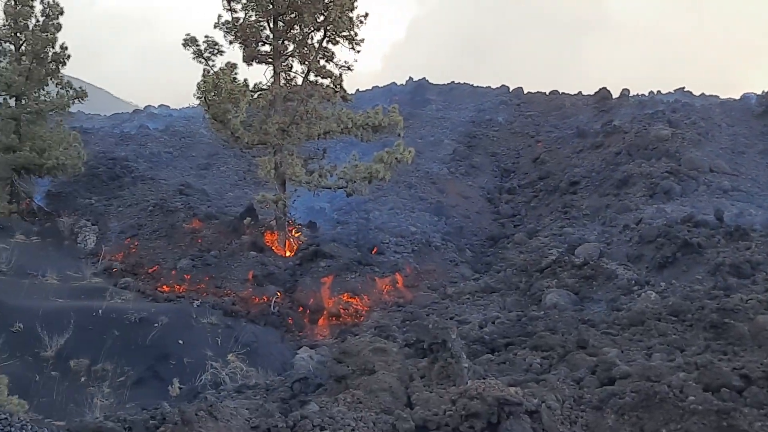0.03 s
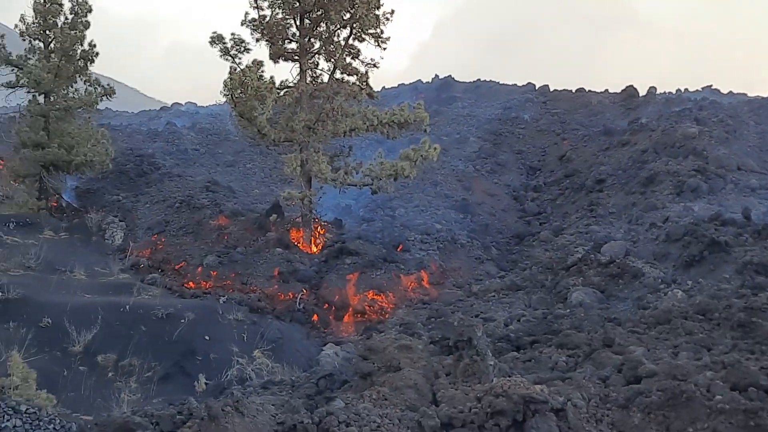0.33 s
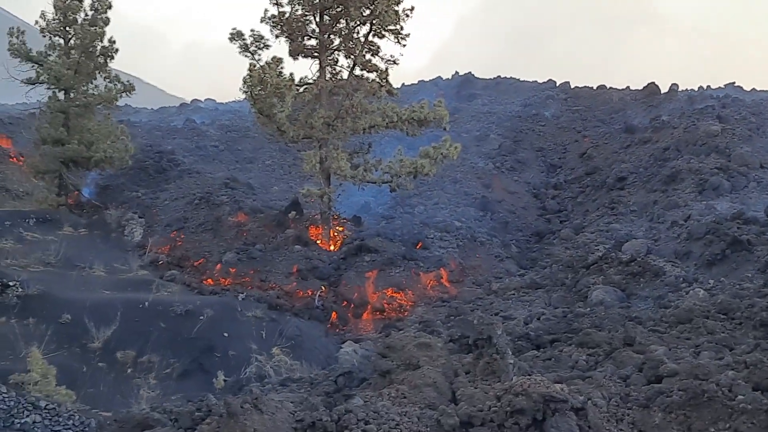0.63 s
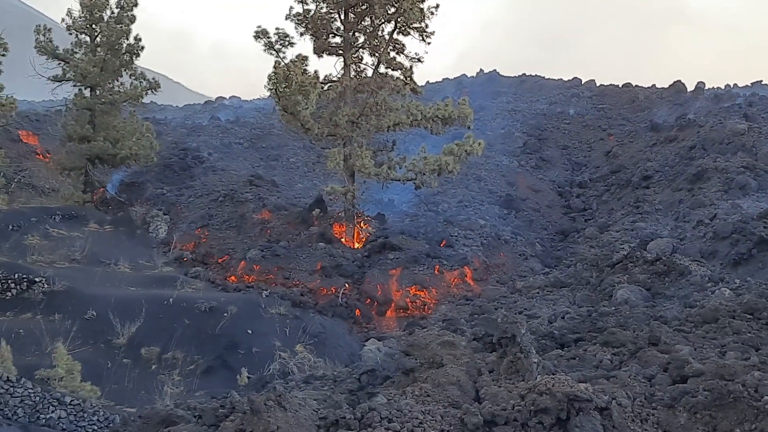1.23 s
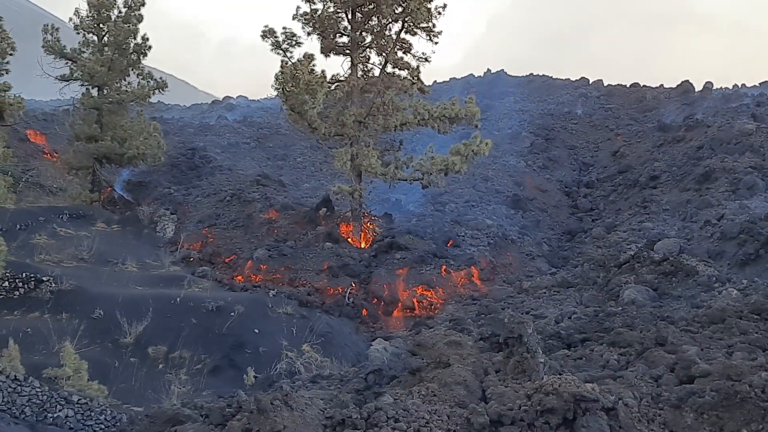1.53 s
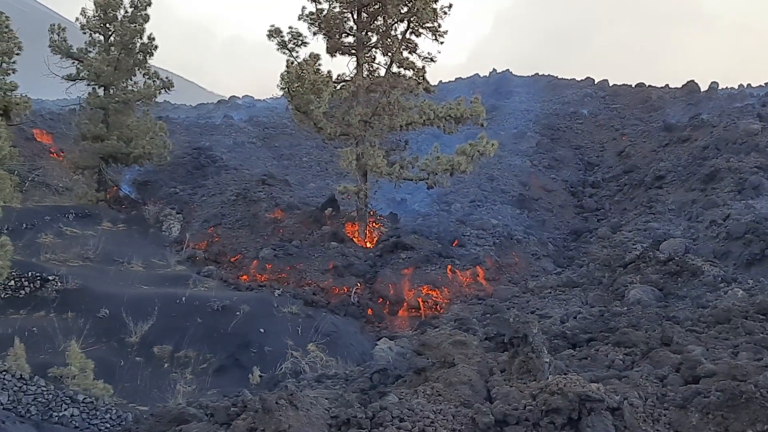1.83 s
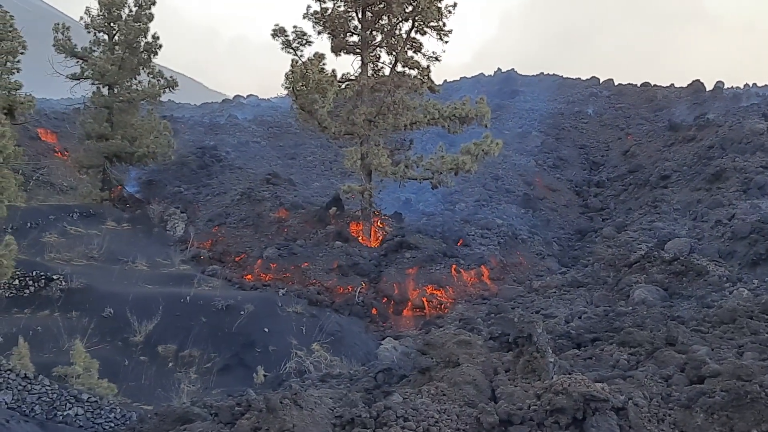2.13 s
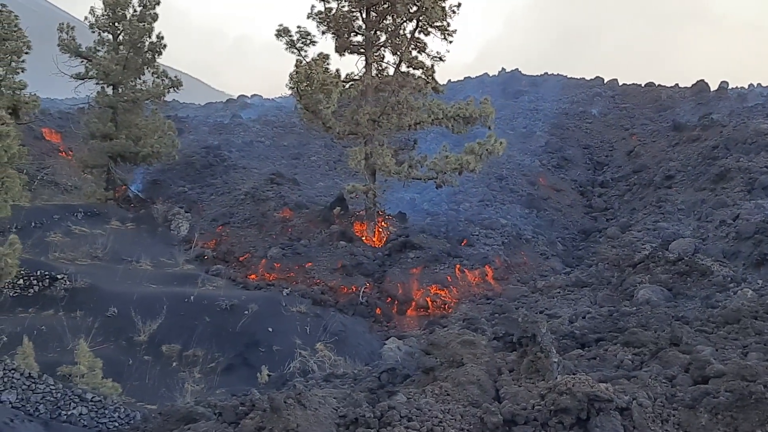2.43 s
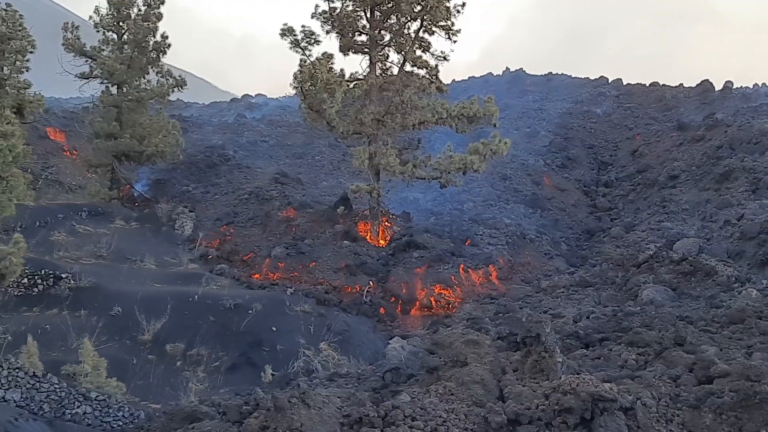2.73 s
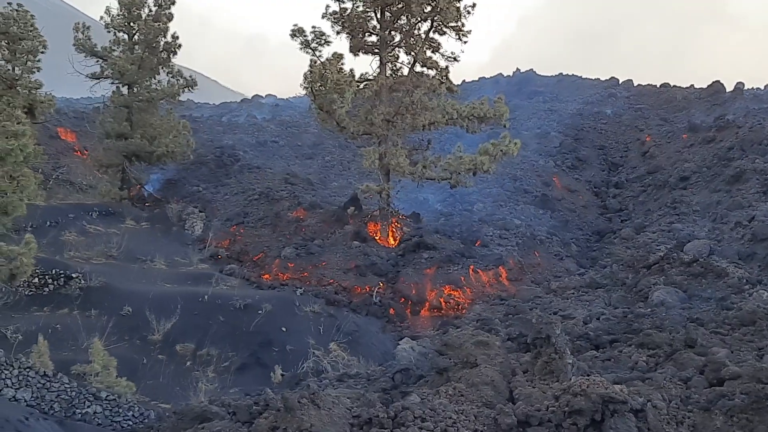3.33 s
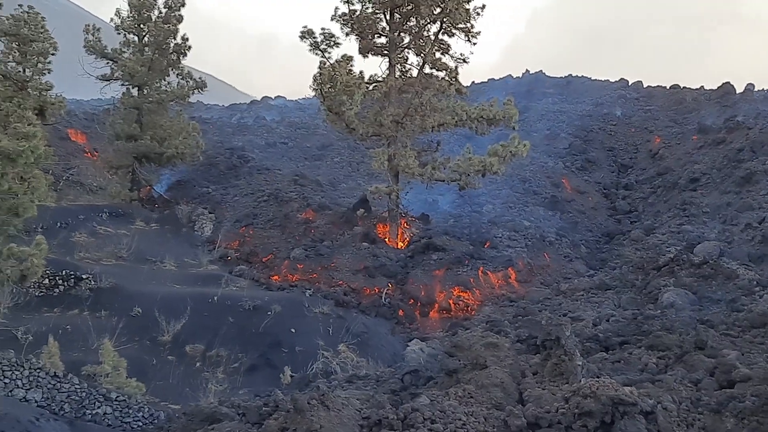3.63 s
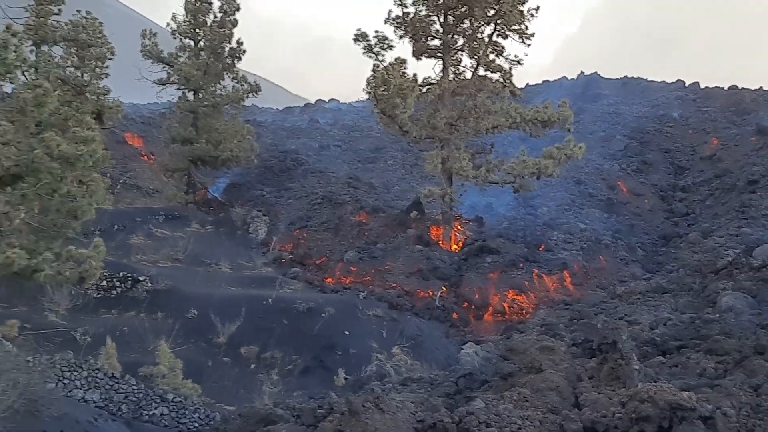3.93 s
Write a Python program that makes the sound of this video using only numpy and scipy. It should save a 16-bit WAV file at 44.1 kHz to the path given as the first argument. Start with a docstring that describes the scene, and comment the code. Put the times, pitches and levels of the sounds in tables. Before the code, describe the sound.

A vegetation fire lit by lava crackles steadily outdoors, with scattered louder pops and brief rattles of embers at a distance. Close up, uneven wind buffets the microphone the whole time with a deep rumble and soft thumps.

```python
"""Lava burning through brush

Some way off, lava creeps into pines and brush. Wood snaps as its fibres break, embers rattle
and small twigs crackle, over a fine sizzle, a few squeaks and a distant roar. Gusts of wind tumble
over the microphone's two openings (ports), making a deep rumble, a hollow flutter and thumps."""
import sys
import numpy as np
from scipy import signal
from scipy.fft import rfft, irfft
from scipy.io import wavfile
from scipy.ndimage import uniform_filter1d

SR = 44100
rng = np.random.default_rng(int(sys.argv[2]) if len(sys.argv) > 2 else 0)


def wav_record(signal):
    """Record a signal, one row per channel, as 16-bit PCM in the file named by sys.argv[1]."""
    frames = np.transpose(np.atleast_2d(signal))
    bounded = np.clip(frames, -1, 1)
    # unit amplitude maps onto the largest positive 16-bit level
    quanta = np.round(bounded * 32767).astype(np.int16)
    wavfile.write(sys.argv[1], SR, quanta)


N = 176400

# The three tone colours in a snap: woody body, sharp bite, fine tick on top (f/Hz, level/dB)
BODY_TONE = [(300, -36), (700, -4.5), (1050, -2.5), (1350, -2), (1800, 0.5), (2200, -1), (2700, -12.5),
             (5000, -39)]
BITE_TONE = [(1500, -31), (2600, -6.5), (3300, -1), (4000, 1), (4900, 1), (6500, -4.5), (8000, -23),
             (12000, -74)]
TICK_TONE = [(4000, -11), (7500, 4), (9500, -4), (11500, -6), (13000, -14), (15500, -20)]
def snap(body_db, bite_db, tick_db, ring_hz, size=512):
    """One piece of wood breaks, its fibres tear on briefly, and it rings at a pitch of its own."""
    break_s, splinter_s, splinter_db = 0.0004, 0.0022, -0.5
    ring_db, ring_octaves, stereo_width = 7, 0.16, 0.71
    t, f = np.arange(size) / SR, np.fft.rfftfreq(size, 1 / SR)
    parts = [(body_db, BODY_TONE), (bite_db, BITE_TONE), (tick_db, TICK_TONE)]
    power = sum((amp(db) * unit(amp(at_pitch(tone, f)))) ** 2 for db, tone in parts)
    octaves_away = np.log2((f + 1) / ring_hz)
    power *= amp(ring_db * np.exp(-(octaves_away / ring_octaves) ** 2)) ** 2
    fade = np.hypot(unit(np.exp(-t / break_s)), amp(splinter_db) * unit(np.exp(-t / splinter_s)))
    hiss = rng.standard_normal((3, size))
    tear = (hiss[2] + stereo_width * hiss[:2]) * fade
    # The tear gives the fine grain; its broad colour is swapped for the wood's.
    tear_power = uniform_filter1d((abs(rfft(tear)) ** 2).mean(0), size=5)
    wood = ringing(10 * np.log10(power / tear_power))
    sound = signal.fftconvolve(tear, wood[None], axes=1)
    energy = power.mean() * SR / 1000  # levels count as if the snap lasted one millisecond
    return sound * np.sqrt(energy / np.sum(sound ** 2, axis=1, keepdims=True))


# Snaps that stand out (t/s, body level/dB, bite level/dB, tick level/dB, ring f/Hz)
WOOD_SNAPS = [(0.0297, -35, -36.5, -40, 1700), (0.051, -51.0, -43.5, -49.5, 1890),
              (0.1615, -48, -39, -47, 6260), (0.372, -39.5, -45, -63.0, 3400),
              (0.5591, -49, -48.5, -50, 1100), (0.6073, -66, -64, -48, 1880),
              (0.6932, -50, -44.5, -45.5, 1400), (0.7285, -64.5, -49, -52.5, 4750),
              (0.7389, -54.0, -33, -38.5, 4700), (0.798, -28.0, -29, -45, 1760),
              (0.824, -67, -50, -54, 12000), (0.8452, -46, -40.5, -47.0, 6060),
              (0.9755, -41.5, -38, -70.0, 7740), (0.9856, -43, -38, -41.5, 7300),
              (0.998, -44, -46, -48, 4310), (1.0151, -34, -41.5, -46.0, 3040),
              (1.1212, -64.0, -55, -59.5, 7740), (1.144, -57, -53, -52, 1795),
              (1.2972, -70, -69, -53, 9870), (1.6183, -44.5, -46.5, -60.0, 8530),
              (1.7548, -61.0, -54, -48.5, 5240), (1.8145, -59.0, -46.5, -53, 3720),
              (1.8738, -24, -24, -65, 3220), (1.9774, -48.5, -45.5, -55, 6060),
              (2.0315, -54.5, -47, -50.5, 6680), (2.1609, -45.5, -49, -46, 4100),
              (2.334, -48, -45, -68.0, 4050), (2.3454, -38.5, -41.5, -53.0, 1710),
              (2.4325, -47, -37.5, -47, 1710), (2.5218, -64, -51, -50.5, 8960),
              (2.5655, -53, -45, -47, 2180), (2.6285, -64, -65, -52, 1400),
              (2.7182, -68.5, -48.5, -50, 6900), (2.7851, -57, -43.5, -48, 5300),
              (2.861, -46.5, -46.0, -50, 3380), (2.8872, -60.5, -57.5, -51.5, 12100),
              (3.0722, -69.0, -66, -51, 12000), (3.1201, -55.5, -52, -48, 12000),
              (3.1703, -62, -46, -48.5, 1100), (3.2277, -24.5, -39, -59, 1170)]
def burning_wood():
    """Burning wood breaks, one snap at a time."""
    out = np.zeros((2, N))
    for s, body_db, bite_db, tick_db, ring_hz in WOOD_SNAPS:
        add(out, s, snap(body_db, bite_db, tick_db, ring_hz))
    return out


def small_snap(ring_hz, tilt_db=0):
    """A twig or ember breaks; more tilt means less body and more tick."""
    return snap(body_db=-4.5 - tilt_db, bite_db=0, tick_db=-7.5 + tilt_db, ring_hz=ring_hz)


# Embers crumbling (t/s, length/s, top bite level/dB, ring f/Hz)
EMBER_RATTLES = [(0.432, .012, -51, 5500), (1.299, 0.14, -62, 7000), (1.879, .008, -41, 4540),
                 (2.432, .028, -48.5, 5200), (3.235, 0.016, -47.5, 2200)]
def embers(bits_per_s=450):
    """An ember falls apart in a quick, uneven run of tiny snaps."""
    out = np.zeros((2, N))
    for s, length_s, db, hz in EMBER_RATTLES:
        for offset in np.arange(0, length_s, 1 / bits_per_s):
            start = s + offset + rng.random() / bits_per_s
            add(out, start, amp(db) * rng.random() * small_snap(hz))
    return out


# How strongly the fire burns; crackle and sizzle both follow it (t/s, level change/dB)
FIRE_STRENGTH = [(0, 3), (.5, 4), (1.0, 1), (1.2, -2.5), (1.55, -0.5), (1.8, 2), (2.2, 5.5), (2.4, 7),
                 (2.8, 3), (3.3, 3), (3.7, 1.5), (4, 2)]
def crackle(snaps_per_s=150, base_db=-71.5, spread_db=4.5, twig_hz=5850):
    """Small twigs snap at random times, most faintly and a few louder."""
    out = np.zeros((2, N))
    for when, big, bright, side, pitch in rng.random((int(snaps_per_s * N / SR), 5)):
        s = when * N / SR
        db = base_db + at_time(FIRE_STRENGTH, s) + spread_db * min(-np.log(1 - big), 4.0)
        side_db = 2.7 * (side - .5) * np.array([[1], [-1]])
        twig = small_snap(twig_hz * 2 ** (2 * pitch - 1), tilt_db=18.5 * (bright - .5))
        add(out, s, amp(db + side_db) * twig)
    return out


def ground_echoes(sound, rubble_db=-13.5, fade_s=0.11, bounce_s=0.0027, bounce_db=-25):
    """Rubble scatters the sound into many tiny echoes, and the ground returns one quick bounce."""
    t = np.arange(SR // 4) / SR
    rubble = rng.standard_normal((2, len(t))) * (rng.random((2, len(t))) < .1)
    rubble *= amp(-60 * t / fade_s) * (t > .002)
    rubble /= np.linalg.norm(rubble[0])
    echoes = amp(rubble_db) * signal.fftconvolve(sound, rubble, axes=1)[:, :N]
    add(echoes, bounce_s, amp(bounce_db) * sound)
    return echoes


# Gusts at the ports (t/s, rumble level/dB, flutter level/dB)
GUSTS = [(0.0, -44, -49), (0.2, -34, -34), (0.29, -41, -46), (0.4, -33.5, -37), (0.5, -31, -38),
         (0.54, -29, -25), (0.58, -32.5, -31), (0.65, -28.5, -30), (0.74, -38, -32), (0.82, -31.5, -33),
         (0.875, -22.5, -24.5), (0.9, -25.5, -35), (0.95, -34, -41), (1.01, -33.5, -35), (1.12, -38, -51.5),
         (1.22, -39.5, -35), (1.29, -40, -43.5), (1.33, -23, -28.5), (1.38, -35, -39), (1.5, -34, -41),
         (1.62, -35.5, -37), (1.69, -39, -30.5), (1.8, -26, -29.5), (1.88, -31, -31), (1.97, -35, -41),
         (2.19, -37, -40.5), (2.25, -33.5, -24), (2.3, -34, -35), (2.35, -33, -26), (2.41, -36.5, -33),
         (2.47, -26, -32), (2.54, -35, -37), (2.58, -27.5, -31.5), (2.68, -38, -40), (2.77, -29, -30.5),
         (2.86, -34, -29), (2.93, -40.5, -37), (2.98, -32.5, -34.5), (3.09, -36, -40), (3.13, -35, -30),
         (3.22, -38.5, -43.5), (3.32, -34, -28), (3.39, -36, -36), (3.48, -34.5, -41), (3.52, -46, -32.5),
         (3.56, -28.5, -41), (3.7, -38, -33), (3.8, -43.5, -43.5), (3.87, -35, -37), (3.92, -45, -43),
         (4.0, -54, -52.5)]
# Short rasps at the peaks of gusts (t/s, half length/s, level/dB, left over right/dB)
GUST_RASPS = [(0.562, 0.008, -31, 11.5), (0.604, 0.0076, -33.5, 8), (0.78, 0.0069, -33.5, 9.5),
              (0.879, 0.01, -32, -3.5), (1.329, 0.015, -34, -7.5), (1.793, 0.019, -38.5, -7),
              (2.462, 0.0098, -33, -11), (2.958, 0.0039, -35.5, 11), (3.296, 0.0091, -38.5, -9),
              (3.367, 0.011, -37, -6), (3.554, 0.0077, -34.5, -6)]
# The wind's tone colours: deep rumble, hollow flutter, airy rush (f/Hz, level/dB)
RUMBLE_TONE = [(15, -21), (32, -21), (45, -9.5), (62, -1), (105, -0.5), (150, -4), (200, -9.5), (300, -23),
               (600, -25), (1500, -99)]
FLUTTER_TONE = [(80, -36.5), (170, -20.5), (240, -8), (310, 2.5), (380, -3), (490, -8.5), (620, -20.5),
                (800, -27), (1200, -47), (2500, -89)]
RUSH_TONE = [(300, -5), (650, -5.5), (1000, -17), (1500, -26.5), (2200, -39), (5000, -61)]
def wind(swirl_db=6, swirl_hz=70, octaves_per_db=.008, strong_gust_db=-26):
    """Air tumbles over each port: it rumbles, flutters and, in the strongest gusts, rushes."""
    t = np.arange(N) / SR
    rumble_db, flutter_db = at_time(GUSTS, t, column=1), at_time(GUSTS, t, column=2)
    churn = noise([(5, -30), (20, 0), (swirl_hz, 0), (3 * swirl_hz, -40), (2000, -90)], likeness=0.91)
    swirls = unit(amp(swirl_db * np.tanh(churn / 2)))  # shakes the level of all three sounds
    rumble = amp(rumble_db + [[-2], [0]]) * noise(RUMBLE_TONE, likeness=0.08)  # softer on the left
    # The flutter rises in pitch as the gust grows.
    usual_db = np.average(flutter_db, weights=amp(flutter_db) ** 2)
    position = np.cumsum(2 ** (octaves_per_db * (flutter_db - usual_db))) % N
    hollow = np.array([np.interp(position, np.arange(N), port) for port in noise(FLUTTER_TONE)])
    flutter = amp(flutter_db + 0.5) * hollow
    rush_gain = amp(-51 + 0.7 * (flutter_db - strong_gust_db))
    for s, half_s, db, balance_db in GUST_RASPS:
        rasp = amp(db + balance_db * np.array([[.5], [-.5]])) * bump(t, s, half_s)
        rush_gain = np.hypot(rush_gain, rasp)
    return swirls * (rumble + flutter + rush_gain * noise(RUSH_TONE))


# Single swirls of air hitting the ports (t/s, level/dB, left over right/dB, rumble over flutter/dB)
WIND_THUMPS = [(0.433, -39.5, -2, 25), (0.512, -24, -1, 3), (0.545, -35, 12, -7), (.631, -29, 2, 0),
               (.663, -25.5, 2, -11.5), (0.715, -36.5, -10, -9), (.811, -35.5, -2, -16),
               (.843, -30.5, 1, -14), (.872, -37, -9, -6), (1.319, -31, -5, -1.5), (1.329, -44, -6, -18),
               (1.693, -36, -10, 0), (1.753, -32.5, 1, 15.5), (1.798, -34, -8, 4), (2.245, -36.5, 3, 12),
               (2.458, -38, 17, 4), (2.582, -34, -10, -3), (3.051, -34.5, -1, 8), (3.285, -36.5, 6, 6),
               (3.324, -35, 12.5, -10), (3.41, -33.5, 0, 3), (3.445, -34.5, 3, -6), (3.553, -28.5, 0, -3.5),
               (3.859, -33.5, 2.5, -9), (3.867, -37, 5, -5)]
def thumps(boost_db=4, length_s=0.02, soft_hz=670, port_lag_s=.0016):
    """A kick of air sets off the rumble and flutter, reaching one port just before the other."""
    out, f = np.zeros((2, N)), np.fft.rfftfreq(4096, 1 / SR)
    treble_cut_db = 10 * np.log10(1 + np.minimum(f / soft_hz, 10) ** 4)  # swirls are soft
    deep = ringing(at_pitch(RUMBLE_TONE, f))
    hollow = ringing(at_pitch(FLUTTER_TONE, f) - treble_cut_db)
    for s, db, balance_db, depth_db in WIND_THUMPS:
        kick = amp(depth_db / 2) * deep + amp(-depth_db / 2) * hollow
        kick *= amp(db + boost_db) * np.sqrt(length_s * SR / 2)  # as much energy as a sound this long
        lag = port_lag_s * rng.uniform(-1.036, 1)
        add(out, s - port_lag_s + lag / 2, np.outer([amp(balance_db / 2), 0], kick))
        add(out, s - port_lag_s - lag / 2, np.outer([0, amp(-balance_db / 2)], kick))
    return out


# Brief pips and squeaks (t/s, half length/s, f/Hz, level/dB)
SAP_SQUEAKS = [(0.577, 0.0026, 1470, -45.5), (3.603, 0.011, 13700, -65), (3.879, 0.0057, 6940, -54)]
def squeaks(width_share=0.079):
    """Narrow bands of hiss swell and fade, probably sap boiling out."""
    t, f = np.arange(N) / SR, np.fft.rfftfreq(N, 1 / SR)
    hiss = rfft(noise([(1000, 0), (16000, 0)], likeness=0.57))
    out = np.zeros((2, N))
    for s, half_s, hz, db in SAP_SQUEAKS:
        band = unit(irfft(hiss * bump(f, hz, width_share * hz), N))
        out += amp(db) * bump(t, s, half_s) * band
    return out


# Tone colour of the low roar and high sizzle together (f/Hz, level/dB)
BACKGROUND_TONE = [(30, 16.5), (100, 17.5), (300, 8.5), (500, 7), (800, 5), (1200, 2.5), (1800, -4),
                   (2700, -14), (5000, -15), (7000, -16.5), (9500, -22), (11500, -24.5), (12500, -29),
                   (16000, -32)]
# How alike left and right are: 1 the same, 0 unrelated, -1 opposite (f/Hz, likeness)
EAR_LIKENESS = [(50, -0.04), (500, 0.44), (800, 0.34), (1300, -0.66), (2200, 0.22), (5000, 0.07),
                (8000, -0.067), (16000, -0.22)]
# Slow rise and fall of the roar (t/s, level change/dB)
ROAR_SWELL = [(0, 0.5), (.5, 1), (1.1, 1), (1.6, 3), (2.4, -2.5), (4, -1.5)]
def sizzle_and_roar(level_db=-47, patch_db=1.66, flicker_db=2.16, hop=128):
    """The distant fire roars low down; above that, a flickering hiss follows its strength."""
    t, hz = np.arange(N // hop + 5) * hop / SR, np.fft.rfftfreq(4 * hop, 1 / SR)
    draws = rng.standard_normal((5, len(t), len(hz)))  # grids of time by pitch
    left, unrelated = draws[0] + 1j * draws[1], draws[2] + 1j * draws[3]
    likeness = at_pitch(EAR_LIKENESS, hz)
    right = likeness * left + np.sqrt(1 - likeness ** 2) * unrelated
    patches = unit(uniform_filter1d(uniform_filter1d(draws[4], size=12, axis=0), size=9, axis=1))
    flicker = unit(uniform_filter1d(rng.standard_normal(len(t)), size=3))
    sizzle_db = (at_time(FIRE_STRENGTH, t) + flicker_db * flicker)[:, None] * hz / (hz + 1500)
    roar_db = at_time(ROAR_SWELL, t)[:, None] * (hz < 2500)
    gain = amp(at_pitch(BACKGROUND_TONE, hz) + patch_db * patches + sizzle_db + roar_db)
    grid = np.array([left, right]) * gain
    _, sound = signal.istft(grid.transpose(0, 2, 1), nperseg=4 * hop, noverlap=3 * hop)
    return amp(level_db) * unit(sound[:, :N])


def amp(db):
    """Turns decibels into a gain."""
    return 10 ** (np.asarray(db) / 20)


def unit(x):
    """Scales a signal to an average strength (rms) of 1."""
    return x / np.sqrt(np.mean(x ** 2) + 1e-20)


def bump(x, centre, half_width):
    """A smooth, bell-shaped hill of height 1."""
    return np.exp(-((x - centre) / half_width) ** 2 / 2)


def at_pitch(table, hz):
    """Reads a table between its rows, on a log-frequency scale."""
    f, value = np.transpose(table)
    return np.interp(np.log(hz + 1), np.log(f + 1), value)


def at_time(table, t, column=1):
    """Reads one column of a table at the given times."""
    columns = np.transpose(table)
    return np.interp(t, columns[0], columns[column])


def add(mix, s, sound):
    """Mixes a stereo sound in at s seconds."""
    part = mix[:, max(round(s * SR), 0):][:, :sound.shape[1]]
    part += sound[:, :part.shape[1]]


def ringing(db, size=2048):
    """The ring after one tap, with energy 1, for levels given from 0 Hz to half the sample rate."""
    cepstrum = irfft(np.log(amp(db)))
    cepstrum[1:len(db) - 1] *= 2
    cepstrum[len(db):] = 0  # nothing sounds before the tap
    response = irfft(np.exp(rfft(cepstrum)))[:size]
    return response / np.linalg.norm(response)


def noise(tone, likeness=0):
    """Stereo noise with a given tone colour and left-right likeness."""
    white = rng.standard_normal((3, N))
    pair = np.sqrt(likeness) * white[2] + np.sqrt(1 - likeness) * white[:2]
    gain = amp(at_pitch(tone, np.fft.rfftfreq(N, 1 / SR)))
    return unit(irfft(rfft(pair) * gain, N))


def scene():
    """Fire in the distance, wind at the microphone."""
    background = sizzle_and_roar()
    air = wind() + thumps()
    fire = burning_wood() + embers() + crackle()
    return fire + ground_echoes(fire) + air + squeaks() + background


def record(dry):
    """Cuts away the very highest treble."""
    top_hz = 15900
    lowpass = signal.firwin(511, top_hz, window=("kaiser", 9), fs=SR)
    return signal.oaconvolve(dry, lowpass[None], "same")


dry = scene()
out = record(dry)
wav_record(out)
```